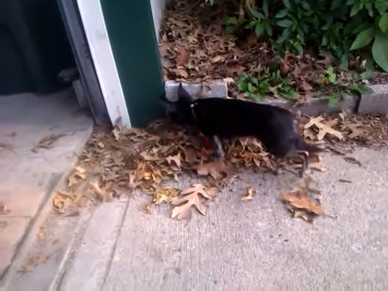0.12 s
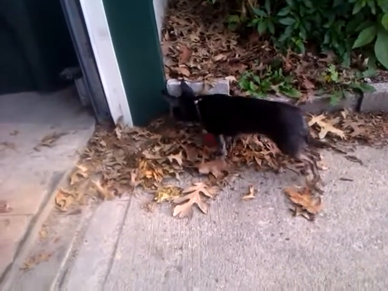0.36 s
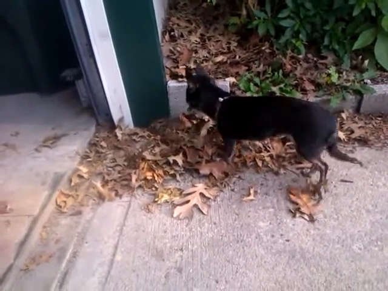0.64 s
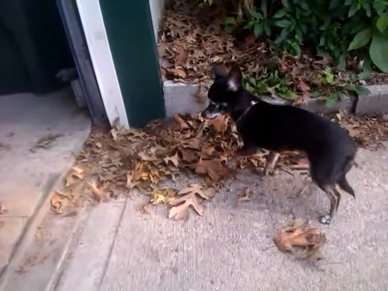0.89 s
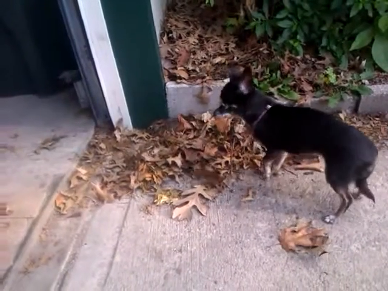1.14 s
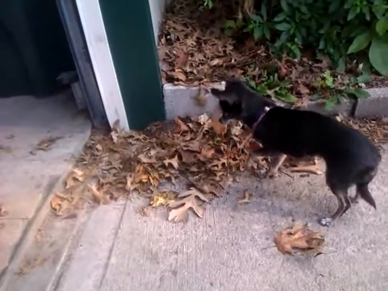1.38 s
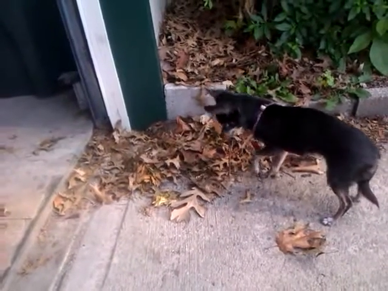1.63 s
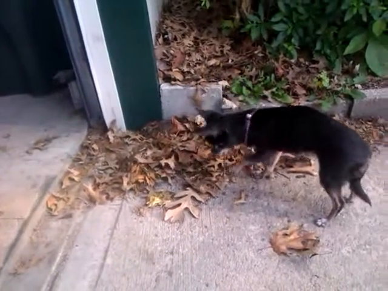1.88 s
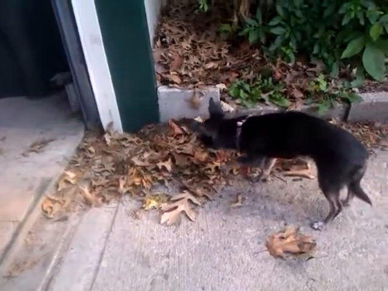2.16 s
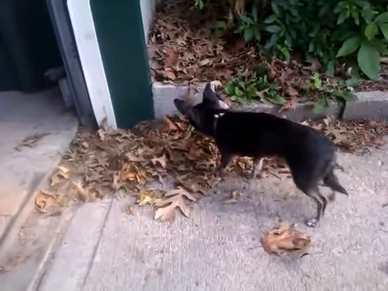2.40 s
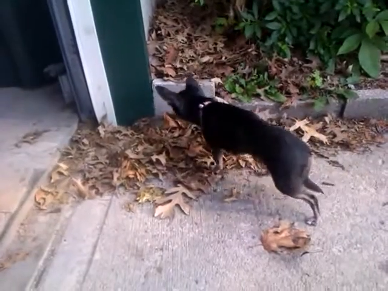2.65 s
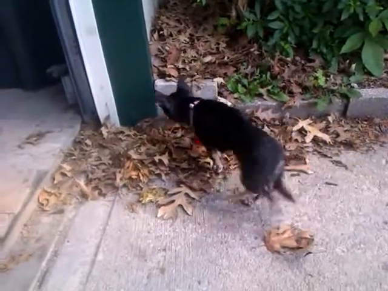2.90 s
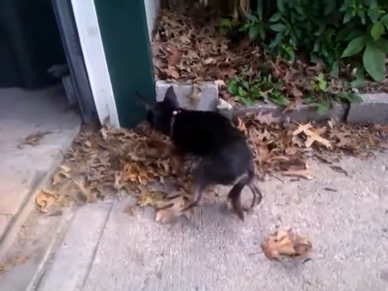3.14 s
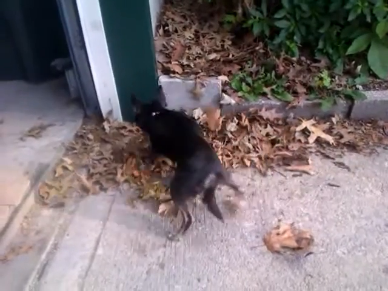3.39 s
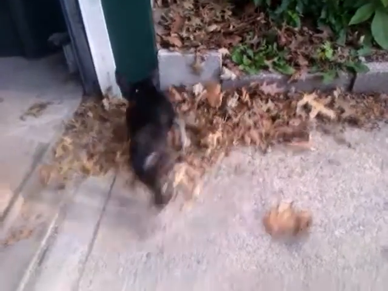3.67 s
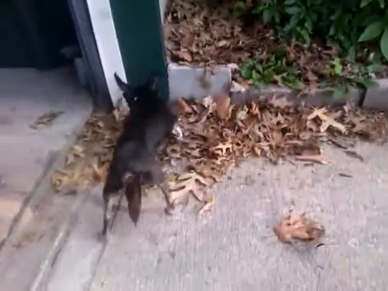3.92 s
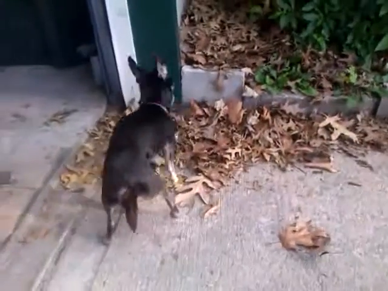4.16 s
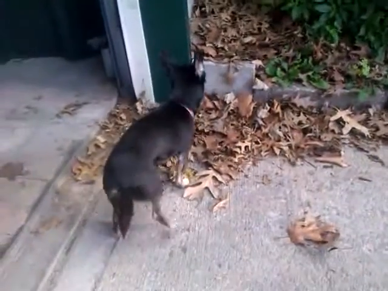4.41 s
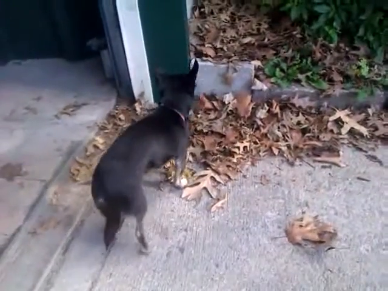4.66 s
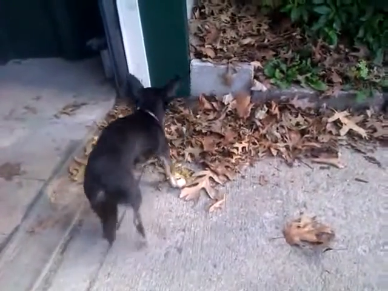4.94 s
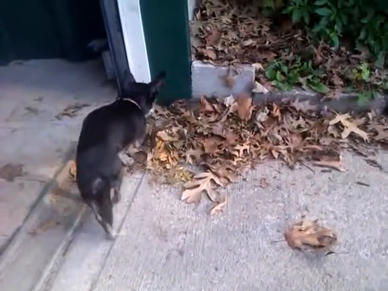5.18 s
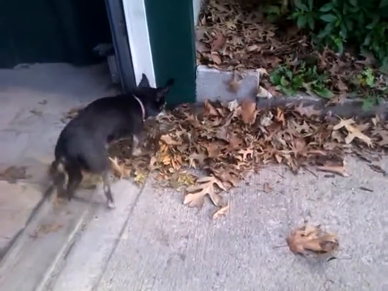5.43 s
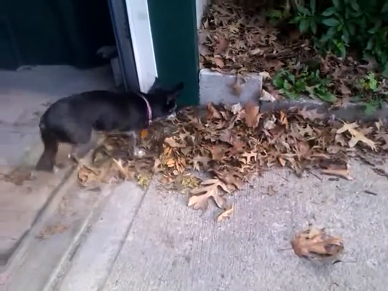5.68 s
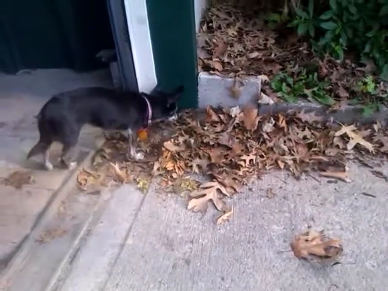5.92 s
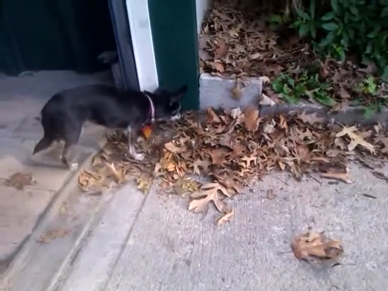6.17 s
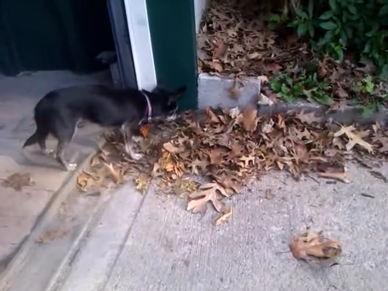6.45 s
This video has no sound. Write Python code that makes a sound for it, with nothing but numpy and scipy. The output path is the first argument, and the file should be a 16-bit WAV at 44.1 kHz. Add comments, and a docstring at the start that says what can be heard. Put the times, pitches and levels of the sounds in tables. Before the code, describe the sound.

Bursts of crunchy leaf rustle begin at once, mixed with brittle snaps and sliding bird whistles. After a short lull with mostly birds, the leaves crackle again, strongest around a quick high jingle of tiny metal tags. Then the movements become sparse and soft, with bent chirps and distant hoarse calls. Outdoors beside a wall and doorway, leaves close to the microphone, birds farther away, faint traffic air and drone underneath.

```python
"""A small dog noses and steps through dry leaves on concrete by a doorway, over the hum of a quiet street.
From the start dense tiny cracks rustle, single leaves snap as short rings, and songbirds whistle gliding
sines; soon hoarse far calls with an octave and bent sparrow chirps join in. The leaves lie almost still
from about 1.6 to 2.2 s; near 3 s decaying sines clink as the collar tags touch. The stirring then thins
out among more chirps, and the songbirds return at about 6 s."""
import sys
import numpy as np
from scipy import signal
from scipy.fft import rfft, irfft, next_fast_len
from scipy.io import wavfile
from scipy.ndimage import uniform_filter1d, map_coordinates

SR = 44100
rng = np.random.default_rng(int(sys.argv[2]) if len(sys.argv) > 2 else 0)


def materialize(psi):
    """Save the field psi as 16-bit PCM at rate SR to the path in sys.argv[1].

    A 1-D psi becomes a single channel; in a 2-D psi each row is a channel.
    """
    bounded = np.clip(np.atleast_2d(psi).T, -1, 1)
    quanta = np.round(bounded * 32767).astype(np.int16)
    wavfile.write(sys.argv[1], SR, quanta)


def attenuation_scalar(level_db):
    """Turn a level in dB into a linear amplitude multiplier (20 dB per decade)."""
    decades = np.asarray(level_db, float) / 20
    return 10 ** decades


N = 289296


def unit(x):
    """Scaled to rms 1."""
    return x / np.sqrt(np.mean(x ** 2) + 1e-20)


def along(points, hz):
    """Interpolates (Hz, value) points on a log frequency axis."""
    point_hz, value = np.transpose(points)
    return np.interp(np.log(hz + 1), np.log(point_hz + 1), value)


def wobble(knots_per_s):
    """A smooth random curve through normal random knots."""
    knots = rng.standard_normal(int(N * knots_per_s / SR) + 4)
    return map_coordinates(knots, [np.arange(N) * knots_per_s / SR])


def coloured(x, spectrum):
    """Filters x by a spectrum of (Hz, dB) points, then scales to rms 1."""
    m = next_fast_len(N + 8192)
    gain = attenuation_scalar(along(spectrum, np.fft.rfftfreq(m, 1 / SR)))
    return unit(irfft(rfft(x, m) * gain, m)[:N])


# Reverberation of the yard. Each row: frequency in Hz, t60 in seconds before the caller's share.
YARD_T60 = [(700, 0.66), (2500, 1), (6000, 0.48), (12000, 0.27)]


def echoes(x, t60_share, delay_s):
    """Walls and ground answer with a noise tail; each frequency dies at its own speed."""
    hz, t, z = signal.stft(rng.standard_normal(SR), SR, nperseg=256)
    t60_s = t60_share * along(YARD_T60, hz)[:, None]
    tail = signal.istft(z * attenuation_scalar(-60 * t / t60_s), SR, nperseg=256)[1]
    delayed = np.pad(x, (int(delay_s * SR), 0))
    return signal.fftconvolve(delayed, tail / np.linalg.norm(tail))[:N]


# Paws and nose push the leaves. Each row: time of full level in seconds, length in seconds,
# rustle level in dB, crispness in dB relative to rustle, drag in dB relative to rustle.
MOVES = [(0, 0.0083, -42, -11, -13), (.075, 0.048, -45.5, -9, -7), (0.13, 0.076, -47.5, -8, -13),
         (0.275, 0.24, -38, -15.5, -12.5), (.465, 0.037, -38.5, -4, -5), (0.506, 0.04, -33.5, -8.5, -13),
         (0.585, 0.06, -39, -6, -11.5), (0.689, 0.059, -35, -5, -12.5), (0.795, 0.063, -33, -11.5, -13),
         (0.888, 0.015, -38.5, -10.5, -10.5), (0.946, 0.57, -45.5, -14, -8.5),
         (2.285, 0.094, -43, -12, -10), (2.365, .07, -41, -10, -13), (2.47, 0.035, -51.5, -7, -9),
         (2.555, 0.05, -44.5, -8.5, -12), (2.63, 0.025, -52.5, -5, -12), (2.7, 0.068, -50.5, -6, -13),
         (2.835, 0.055, -43.5, -8, -14), (2.905, 0.016, -36, -9.5, -31), (2.987, 0.097, -32, -6.5, -11.5),
         (3.125, 0.032, -32.5, -0.5, -30), (3.237, 0.017, -37, -1.5, -12), (3.327, 0.11, -38.5, -5.5, -14),
         (3.455, 0.05, -32, -4, -16), (3.575, .01, -38.5, -11, -16), (3.602, 0.032, -44, -6.5, -12.5),
         (3.678, 0.16, -35, -5, -17.5), (3.825, 0.0089, -31, -12.5, -17), (3.903, 0.068, -38, -8, -14.5),
         (3.985, 0.14, -35.5, -7, -18), (4.106, 0.084, -48.5, -7, -8), (4.215, 0.079, -34, -4, -24),
         (4.349, .03, -42, 0.5, -17), (4.475, 0.012, -44.5, -7, -9), (4.955, 0.19, -41, -5, -24),
         (5.117, 0.077, -51, 1.5, -2.5), (5.258, 0.032, -42, -3.5, -14), (5.325, 0.12, -45, -3.5, -8),
         (5.498, 0.027, -44, -12.5, -25), (5.555, 0.044, -51.5, 3, -18), (5.59, .02, -53, -5, -14),
         (5.66, 0.11, -56.5, -3, -12), (5.781, 0.0091, -53, -2, -19), (5.847, 0.0066, -44.5, -6, -22),
         (5.945, 0.035, -45.5, -5, -21), (6, 0.1, -50, -9.5, -1), (6.175, 0.22, -50.5, -9.5, -6.5),
         (6.495, 0.034, -47, -10, -6)]
# The pile at rest in the breeze: rustle, crispness and drag levels, all in dB.
RESTING_DB = [-64, -72, -65]


def stirring():
    """Gains of rustle, crispness and drag: every move rises fast, sags while it lasts and settles."""
    rise_db_per_s, sag_db_per_s, settle_db_per_s = 339, 36.5, 238
    power = attenuation_scalar(np.array(RESTING_DB)[:, None]) ** 2 + np.zeros((3, N))
    t = np.arange(-SR // 4, SR) / SR
    for s, length_s, db, crisp_db, drag_db in MOVES:
        loss_db = rise_db_per_s * np.maximum(-t, 0) + sag_db_per_s * np.maximum(t, 0)
        loss_db += settle_db_per_s * np.maximum(t - length_s, 0)  # on top of the sag
        at = np.round((s + t) * SR).astype(int)
        inside = (at >= 0) & (at < N)
        peaks = attenuation_scalar(np.array([db, db + crisp_db, db + drag_db]))
        power[:, at[inside]] += np.outer(peaks, attenuation_scalar(-loss_db[inside])) ** 2
    return np.sqrt(power)


def crackle(rate_hz, spread_db, decay_s, bed):
    """Loudness of sudden random bursts of unequal size, each decaying exponentially, over a steady bed."""
    size = attenuation_scalar(spread_db * np.minimum(rng.exponential(size=N), 2.6))
    starts = (rng.random(N) < rate_hz / SR) * size
    bursts = signal.lfilter([1], [1, -np.exp(-1 / (decay_s * SR))], starts)
    return unit(bursts) + bed


def patchy(depth_db):
    """Noise whose colour varies at random in small patches of time and frequency."""
    z = signal.stft(rng.standard_normal(N), nperseg=128)[2]
    field = uniform_filter1d(rng.standard_normal(z.shape), size=3, axis=0)
    field = uniform_filter1d(field, size=3, axis=1)
    return signal.istft(z * attenuation_scalar(depth_db * unit(field)), nperseg=128)[1][:N]


# Hollow body of the leaves. Each row: frequency in Hz, relative gain in dB.
LEAF_BODY = [(1500, -55), (2500, -39), (3000, -22), (3550, -7), (4300, -2), (5000, 3.5), (6000, -4),
             (7200, -13), (8200, -46), (9000, -120)]
# Crisp leaf edges. Each row: frequency in Hz, relative gain in dB.
LEAF_EDGES = [(4500, -58), (6000, 0), (7500, 5.5), (9100, 1.5), (10700, -4), (12700, -3), (16000, -8.5)]
# Leaves dragged over concrete. Each row: frequency in Hz, relative gain in dB.
SCRAPE = [(560, -25.5), (950, -4.5), (1180, -8), (1310, -5), (2040, 1.5), (3300, -4), (4290, -36),
          (7260, -120)]


def rustle():
    """Stiff leaves rub and buckle: dense tiny cracks sound their hollow body, crisp edges and scrape."""
    body_gain, crisp_gain, drag_gain = stirring()
    cracks = crackle(650, spread_db=3.5, decay_s=.0014, bed=.75)
    surge = attenuation_scalar(0.5 * wobble(26.02))
    body = body_gain * surge * coloured(cracks * patchy(depth_db=1.5), LEAF_BODY)
    # a larger added bed makes the sound steadier
    crisp = crisp_gain * surge * coloured((cracks + 1.5) * patchy(depth_db=4), LEAF_EDGES)
    drag = drag_gain * coloured((cracks + 11.0) * patchy(depth_db=4.0), SCRAPE)
    return body + crisp + drag


# Leaves cracking; the short click at 5.497 s is the sharp start of a sparrow chirp. Each row: start in seconds,
# ring peak in dB, approximate ring pitch in Hz, edge peak in dB relative to the ring.
SNAPS = [(.0772, -23.5, 5560, -14), (.0928, -25.5, 5600, -5), (.1007, -18, 5440, -8.5),
         (.137, -32, 4940, -12), (.196, -36, 4290, -10), (.3286, -22, 5200, -13), (.463, -24.5, 5400, -9),
         (.6396, -25, 5600, -18), (.6729, -25, 5660, -10), (.7552, -17, 5540, -20), (.765, -20, 5330, -22),
         (.8869, -22, 5100, -21), (.9686, -28, 5340, -24), (1.023, -27, 5270, -6.5),
         (1.0869, -33.5, 5150, -12), (1.1428, -35, 4860, -4), (2.2742, -32.5, 5600, -5),
         (2.2862, -25, 5070, -10), (2.306, -28, 5570, -4), (2.3668, -16, 4980, -13),
         (2.45, -21.5, 5630, -9.5), (2.5536, -27, 4960, -6), (2.636, -34, 5060, -12),
         (2.7393, -35, 4920, 3), (2.748, -32, 5000, -6), (2.833, -30, 5160, -3), (2.9188, -18, 5070, -13),
         (2.96, -20, 4960, -1), (2.9996, -30, 4760, -10), (3.047, -17.5, 5450, -18),
         (3.0699, -9.5, 5170, -5), (3.082, -25, 5220, -26), (3.1277, -13, 6900, -19),
         (3.236, -11.5, 4680, -6.5), (3.3233, -28, 5340, 4), (3.458, -22.5, 5070, -7),
         (3.4753, -27, 4590, 1), (3.482, -21, 4340, -5), (3.5013, -14.5, 4700, -22),
         (3.5438, -25, 5240, -7), (3.5613, -24, 4310, -12), (3.5768, -22.5, 4750, -17),
         (3.6583, -18.5, 4470, -2), (3.6654, -21, 4900, -14), (3.8332, -12.5, 4700, -28),
         (3.8853, -32, 4800, 4), (3.9952, -18.5, 4930, -15), (4.0896, -25, 4400, -3),
         (4.2119, -20, 4200, 6), (4.2198, -17.5, 5430, -13), (4.2288, -16.5, 5240, 1.5),
         (4.2587, -24, 4800, -1), (4.2795, -16.5, 7430, -3), (4.3042, -26.5, 8800, -10),
         (4.3485, -31.5, 5260, 8), (4.3638, -25, 8800, 4), (4.385, -34, 5500, -5), (4.462, -30.5, 5500, 2),
         (4.479, -27, 5370, 0), (5.1015, -28, 5240, 4), (5.1881, -36, 5400, -10), (1.2518, -37, 4850, -4),
         (0.2444, -31.5, 4930, -4), (5.2672, -25, 4600, -5), (5.3229, -27, 4400, 0),
         (5.3393, -22.5, 4900, -14), (5.3762, -21.5, 4720, -5.5), (5.497, -27, 4900, -20),
         (5.9454, -36, 4630, -14)]


def snaps():
    """A leaf breaks: a few cycles of its noise-driven resonance and a sharp bright edge."""
    out, t = np.zeros(N + SR), np.arange(SR // 50) / SR
    bright = signal.butter(3, 7000, "high", fs=SR)
    shape = (1 - np.exp(-t / .0005)) * np.exp(-t / .0016)
    for s, db, hz, edge_db in SNAPS:
        noise = rng.standard_normal((2, len(t)))
        poles = [1, -2 * 0.91 * np.cos(2 * np.pi * hz / SR), 0.914 ** 2]
        ring = shape * noise[0]
        for _ in range(2):  # steep skirts: nothing low in a leaf
            ring = signal.lfilter([1, 0, -1], poles, ring)
        edge = signal.lfilter(*bright, shape * noise[1])
        snap = ring / abs(ring).max() + attenuation_scalar(edge_db) * edge / abs(edge).max()
        out[round(s * SR):][:len(t)] += attenuation_scalar(db) * snap
    return out[:N]


# Ringing modes of the two tags. Each row: frequency in Hz, relative level in dB, t60 in seconds.
TAG_MODES = [(6850, -2, .07), (7480, -4, .05), (9900, 0, .045), (12720, -6, .05), (15100, -5, .03)]
# Touches of the tags. Each row: start in seconds, level in dB, extra level of the larger tag in dB.
CLINKS = [(2.958, -16, -6), (3.113, -20, 1), (3.128, -17, -9), (3.137, -15, -6), (3.149, -16.5, -4),
          (3.165, -19.5, 3), (3.178, -23, -1), (3.218, -28, 3)]


def tags():
    """Two small metal tags chatter; every touch bounces and rings each mode at new strength."""
    out, t = np.zeros(N + SR), np.arange(SR // 4) / SR
    for s, db, larger_db in CLINKS:
        for bounce in range(3):
            ring = np.zeros(len(t))
            for hz, mode_db, t60_s in TAG_MODES:
                strength, detune = rng.normal(size=2)
                level_db = mode_db + larger_db * (hz < 8500) + 6.7 * strength  # larger tag: below 8500 Hz
                sine = np.sin(2 * np.pi * hz * (1 + 0.0056 * detune) * t)
                ring += attenuation_scalar(level_db - 60 * t / t60_s) * sine
            start = round((s + bounce * 0.002 * (.5 + rng.random())) * SR)
            out[start:][:len(t)] += attenuation_scalar(db - 2.9 * bounce) * ring / len(TAG_MODES)
    return out[:N]


def arched(s, length_s, first_hz, middle_hz, last_hz, db, loudest, start_db, end_db):
    """Rows (s, Hz, dB) of a note bent through three pitches; it peaks at the share loudest of its length."""
    u = np.linspace(0, 1, num=15)
    hz = first_hz * (1 - u) * (1 - 2 * u) + middle_hz * (2 * u) * (2 - 2 * u) + last_hz * u * (2 * u - 1)
    under_db = np.where(u < loudest, start_db, end_db) * np.interp(u, [0, loudest, 1], [1, 0, 1]) ** 2
    return np.transpose([s + length_s * u, hz, db - under_db])


def whistle(out, rows, rough, hoarse=0):
    """Adds one note: a sine on its pitch curve, soft ends, pitch flutter and a fast random rasp of its level."""
    s, hz, db = np.transpose(rows)
    t = np.arange(s[0] * SR, min(s[-1] * SR, N - 1)) / SR
    ends = np.clip(np.minimum(t - s[0], s[-1] - t) / .004, 0, 1)
    flutter, rasp = uniform_filter1d(rng.standard_normal((2, len(t))), size=60)
    pitch_hz = np.interp(t, s, hz) * (1 + rough * flutter)
    tone = np.sin(2 * np.pi * np.cumsum(pitch_hz) / SR)
    tone *= (1 + hoarse * unit(rasp)) / np.hypot(1, hoarse)
    note = np.sqrt(2) * ends * attenuation_scalar(np.interp(t, s, db)) * tone
    return out + np.pad(note, (int(s[0] * SR), N))[:N]


# Songbird notes. Each row: start in seconds, length in seconds, first, middle and last pitch in Hz,
# level at the loudest point in dB.
SONG = [(0.044, .02, 2700, 3140, 3200, -38), (.29, 0.13, 2220, 2174, 2210, -55),
        (1.572, .015, 2800, 2560, 2350, -48), (0.151, 0.048, 2425, 2270, 2260, -40),
        (0.145, 0.075, 2910, 2930, 3030, -46), (.2, 0.035, 2177, 2191, 2240, -30.5),
        (0.244, 0.032, 2240, 2390, 2570, -41.5), (.53, 0.13, 2645, 2623, 2560, -49.5),
        (0.601, 0.027, 3330, 3330, 3140, -40), (.656, 0.02, 2630, 2740, 2650, -36.5),
        (0.689, 0.057, 3100, 3010, 3010, -40.5), (0.734, 0.066, 3000, 3004, 2960, -37.5),
        (.835, 0.025, 2620, 2700, 2720, -44), (1.156, 0.027, 2560, 2440, 2350, -45.5),
        (1.181, .035, 2390, 2375, 2354, -31), (1.213, 0.036, 2350, 2333, 2310, -32),
        (1.248, 0.03, 2250, 2137, 2024, -31), (1.288, 0.069, 2500, 2820, 2640, -45.5),
        (1.32, 0.073, 2317, 2357, 2320, -36.5), (1.376, 0.093, 3170, 2957, 3030, -48),
        (1.388, 0.028, 2260, 2257, 2180, -39), (1.505, 0.035, 2400, 2640, 2550, -52.5),
        (1.606, 0.042, 2860, 2520, 2500, -52), (1.646, 0.078, 2485, 2502, 2456, -54),
        (1.832, 0.045, 3030, 3000, 2880, -39.5), (1.86, 0.024, 3060, 3300, 2900, -48),
        (1.876, 0.047, 2760, 2400, 2290, -46), (1.927, 0.074, 2190, 2000, 1974, -54),
        (2.127, .09, 2710, 2794, 2710, -52.5), (2.522, 0.048, 3100, 2880, 2800, -48.5),
        (2.559, 0.03, 2780, 2665, 2970, -46), (2.616, 0.057, 2320, 2320, 2220, -54.5),
        (2.648, 0.056, 2710, 2743, 2480, -45), (2.706, 0.085, 2330, 2230, 2180, -55.5),
        (3.26, 0.095, 2695, 2790, 2820, -51.5), (3.41, 0.07, 2440, 2440, 2480, -47.5),
        (3.455, 0.037, 2460, 2650, 2820, -50), (1.813, .02, 1980, 2150, 2350, -53.5),
        (5.998, 0.02, 3030, 2630, 2760, -40.5), (6.02, 0.045, 2770, 3110, 2670, -43),
        (6.066, 0.046, 2267, 2010, 2190, -36), (6.5, 0.018, 2760, 3140, 3280, -38)]
# Songbird notes that swell late. Each row: the same columns and units as SONG.
LATE_SWELLING = [(0, 0.039, 3320, 3327, 3380, -36), (0.059, .034, 3145, 2370, 2010, -33.5),
                 (0.624, 0.032, 3150, 2970, 2660, -33), (0.796, 0.039, 2960, 2725, 2585, -32.5),
                 (1.999, 0.063, 1980, 2130, 2340, -44.5), (5.933, 0.058, 2340, 2325, 2420, -37.5),
                 (6.452, 0.045, 3330, 3385, 3380, -35.5), (6.514, 0.036, 3200, 2460, 1920, -35)]


def songbirds():
    """Clear gliding whistles, smeared by near branches and ringing on faintly between the houses."""
    notes = [arched(*row, loudest=0.38, start_db=3.2, end_db=5.5) for row in SONG]
    notes += [arched(*row, loudest=0.76, start_db=12.3, end_db=5) for row in LATE_SWELLING]
    out = np.zeros(N)
    for note in notes:
        out = whistle(out, note, rough=0.081, hoarse=0.031)
    smear = attenuation_scalar(-10.5) * echoes(out, t60_share=0.098, delay_s=0.00298)
    far = attenuation_scalar(-12) * echoes(out, t60_share=0.7, delay_s=.012)
    return out + smear + far


# Sparrow chirps. Each row: start in seconds, length in seconds, first, middle and last pitch in Hz,
# level at the loudest point in dB.
CHIRPS = [(1.325, 0.048, 5670, 3790, 4900, -44.5), (1.61, 0.045, 4780, 4480, 4360, -59),
          (1.843, 0.033, 4450, 4690, 5200, -50), (1.864, 0.056, 5440, 5590, 6150, -42.5),
          (1.914, 0.029, 5960, 5020, 4520, -44), (1.985, 0.034, 5390, 4940, 5750, -47),
          (2.367, 0.031, 4380, 3800, 3670, -44), (4.464, 0.05, 4700, 5645, 5840, -40.5),
          (4.502, 0.039, 5970, 5000, 4450, -42.5), (4.566, 0.039, 5220, 4730, 5130, -44.5),
          (5.014, 0.05, 5620, 4970, 4620, -36.5), (5.111, 0.043, 5170, 4690, 4270, -41),
          (5.494, 0.024, 4620, 5050, 4100, -44), (5.52, .05, 4200, 3670, 3140, -47),
          (5.568, 0.026, 3260, 3570, 3950, -60), (5.981, 0.051, 4660, 5570, 6000, -41.5),
          (6.027, 0.048, 5970, 5770, 4580, -39.5), (6.109, 0.039, 5140, 4690, 4730, -44.5),
          (6.49, 0.016, 4360, 4480, 4700, -40)]


def sparrows():
    """Hoarse bent chirps, smeared by near hedges and far walls."""
    out = np.zeros(N)
    for row in CHIRPS:
        out = whistle(out, arched(*row, loudest=0.61, start_db=3.2, end_db=7.5), rough=.17, hoarse=.55)
    hedges = attenuation_scalar(-5.5) * echoes(out, t60_share=0.45, delay_s=0.0016)
    walls = attenuation_scalar(-6.0) * echoes(out, t60_share=1.38, delay_s=0.0057)
    return out + hedges + walls


# Far calls. Each row: start in seconds, length in seconds, starting pitch in Hz, starting level in dB,
# octave in dB relative to that level.
FAR_CALLS = [(0.802, 0.12, 791, -56.5, -18), (3.952, 0.13, 792, -53.5, -15), (4.103, 0.14, 1302, -56, -18),
             (4.462, 0.15, 2158, -56, -25), (4.55, 0.11, 781, -52, -22), (4.85, 0.17, 726, -58.5, -10),
             (4.872, 0.082, 1863, -56.5, -25), (5.1, 0.11, 741, -54.5, -1),
             (5.378, 0.17, 1521, -51.5, -8.5), (5.332, 0.13, 993, -56, -20), (6.211, 0.12, 779, -54, -14),
             (6.47, .09, 754, -54, 0)]


def far_calls():
    """Short hoarse calls with an octave, falling in pitch and level, dull and wet with distance."""
    out = np.zeros(N)
    for s, length_s, call_hz, db, octave_db in FAR_CALLS:
        for hz, level_db in ((call_hz, db), (2 * call_hz, db + octave_db)):
            held = [(s, hz, level_db), (s + length_s / 3, hz, level_db)]
            fall = [(s + length_s, 0.85 * hz, level_db - 16)]
            out = whistle(out, held + fall, rough=.28, hoarse=.6)
    return out + attenuation_scalar(-4.0) * echoes(out, t60_share=0.96, delay_s=.015)


# Far traffic and air. Each row: frequency in Hz, relative gain in dB.
STREET_AIR = [(12, -2), (20, 0.5), (123, -4), (472, -15), (802, -15), (1220, -16.5), (1440, -14.5),
              (2200, -39), (2390, -17), (2750, -50), (2990, -22), (5080, -21.5), (5530, -28), (7950, -36),
              (16000, -34)]
# A far machine's drone. Each row: frequency in Hz, relative gain in dB.
DRONE_COLOUR = [(60, -120), (85, -9), (105, -13), (118, 0), (130, -18), (160, -63), (220, -120)]
# Course of the drone. Each row: time in seconds, level in dB.
DRONE_LEVEL = [(0.0, -66), (0.64, -63.5), (0.84, -68), (1.31, -58.5), (3.05, -66), (3.45, -57.5),
               (3.98, -64), (4.82, -54), (5.01, -63.5), (5.3, -66.5), (5.72, -56), (6.45, -59), (6.56, -57)]


def street():
    """Far traffic and air breathe slowly as coloured noise; a low narrow-band drone comes and goes."""
    air_db = -53.5 + 0.17 * wobble(0.59)
    air = attenuation_scalar(air_db) * coloured(rng.standard_normal(N), STREET_AIR)
    drone_db = np.interp(np.arange(N) / SR, *np.transpose(DRONE_LEVEL))
    return air + attenuation_scalar(drone_db) * coloured(rng.standard_normal(N), DRONE_COLOUR)


def scene():
    """The dog is near, in the corner of wall and step; the rest is far."""
    dog = rustle() + snaps() + tags()
    near = dog + attenuation_scalar(-10.5) * echoes(dog, t60_share=0.2, delay_s=.003)
    return (near + songbirds() + sparrows() + far_calls() + street())[None]


def low_pass(x):
    """Removes everything above the highest recorded frequency."""
    return signal.sosfilt(signal.butter(12, 16830, fs=SR, output="sos"), x)


def record(dry):
    """The camera's band limit and a small offset from its converter."""
    top_hz, offset = 16100, -.0014
    m = next_fast_len(N)
    passband = np.fft.rfftfreq(m, 1 / SR) < top_hz
    limited = irfft(rfft(dry, m) * passband, m)[:, :N]
    return low_pass(limited + offset)


dry = scene()
out = record(dry)
materialize(out)
```